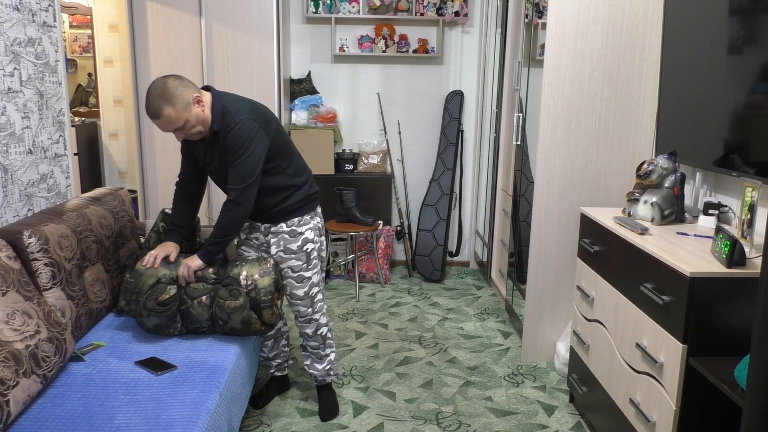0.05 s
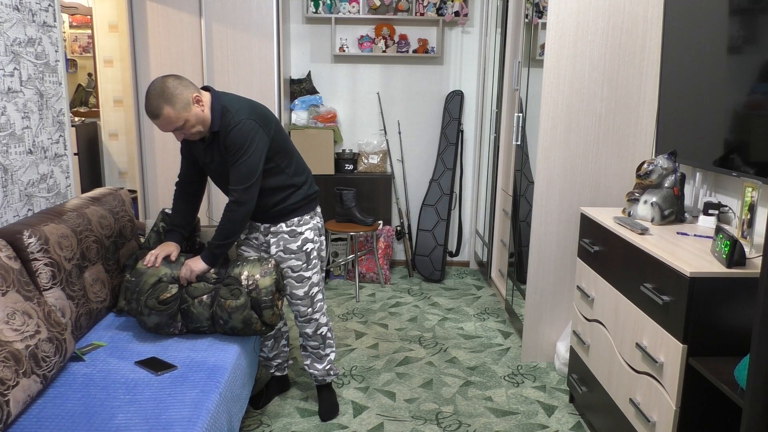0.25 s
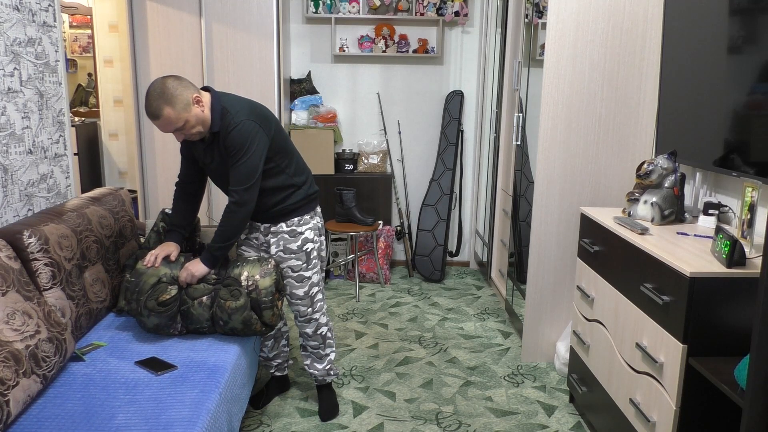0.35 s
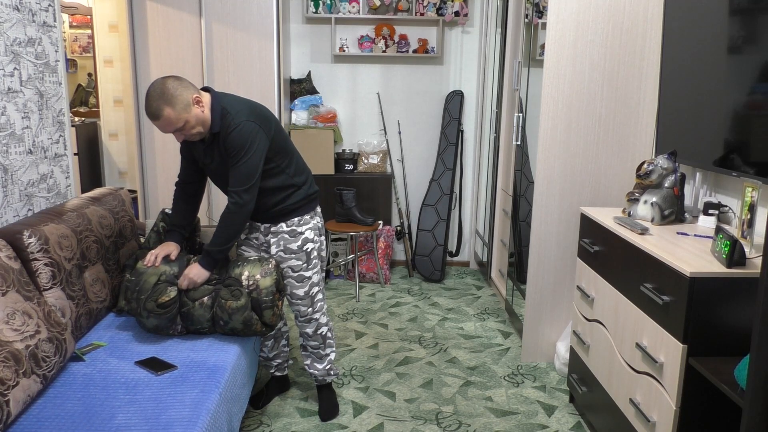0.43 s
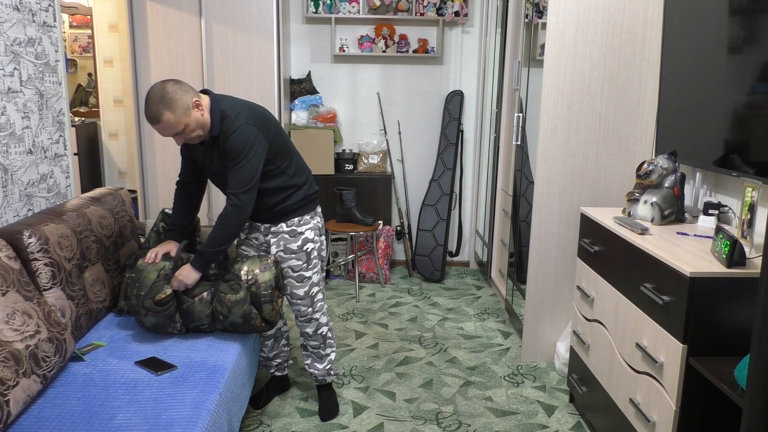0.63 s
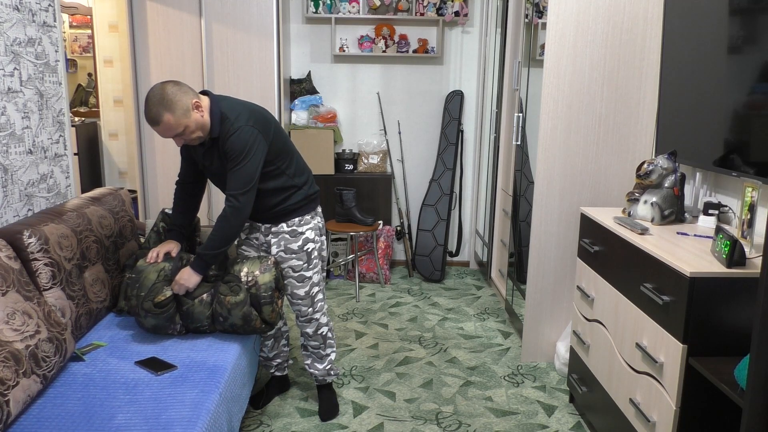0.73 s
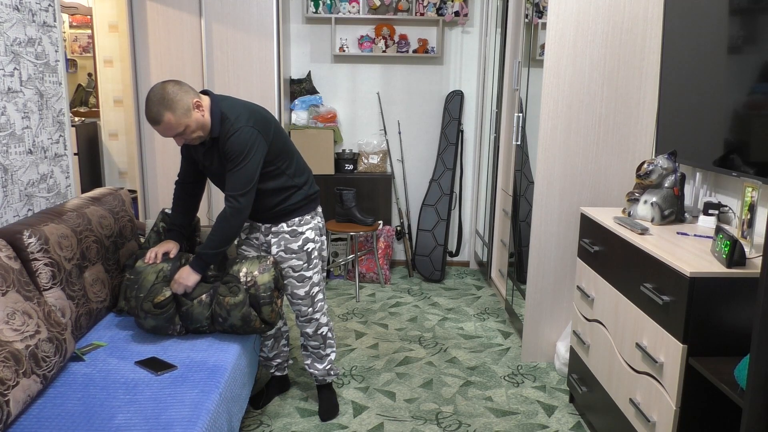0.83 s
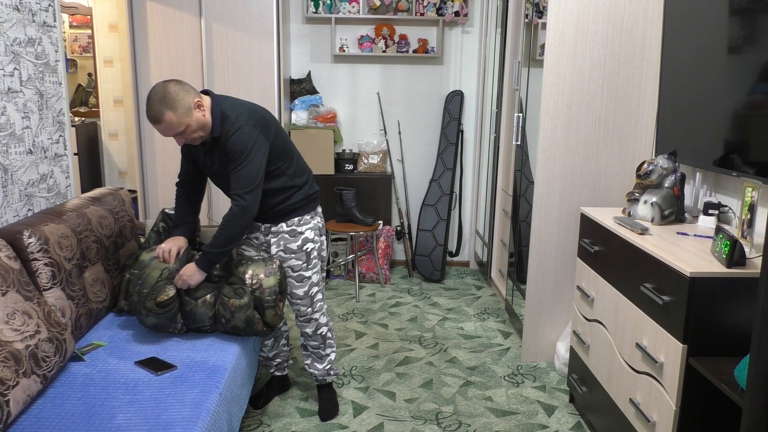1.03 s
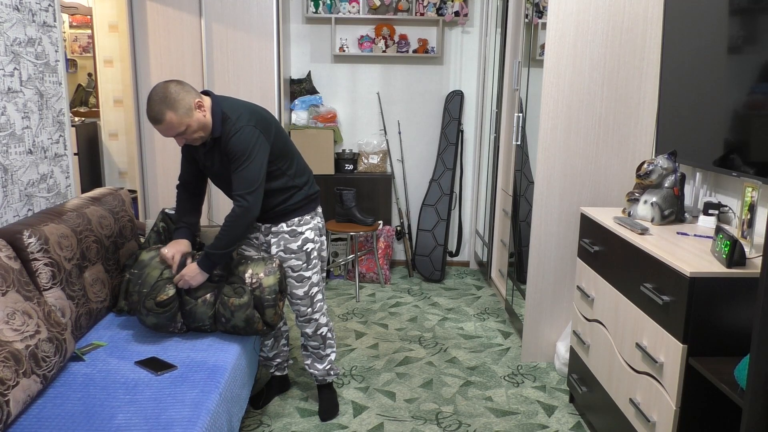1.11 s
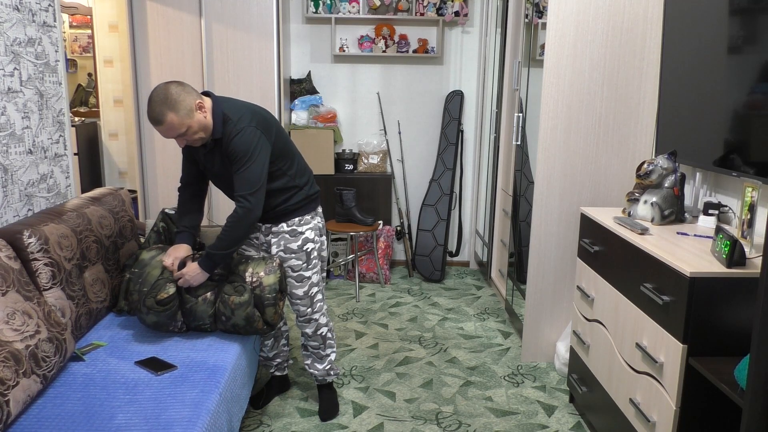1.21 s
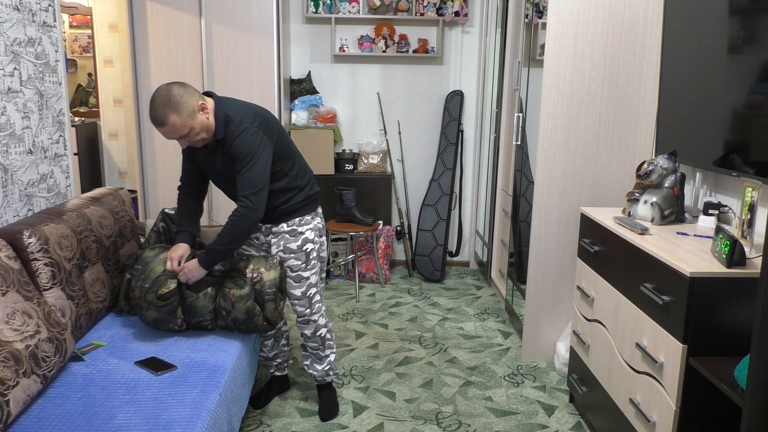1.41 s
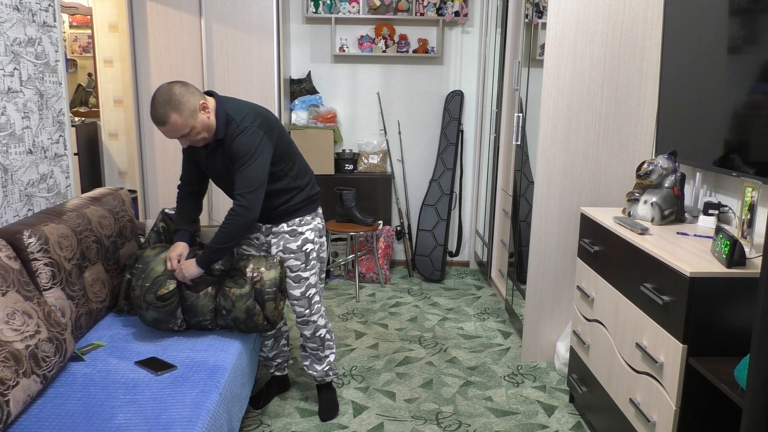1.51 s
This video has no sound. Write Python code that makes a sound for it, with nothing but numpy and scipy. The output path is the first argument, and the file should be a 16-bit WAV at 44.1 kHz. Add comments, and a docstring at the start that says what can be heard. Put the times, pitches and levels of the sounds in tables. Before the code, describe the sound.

Nylon rustles and crinkles as a stuffed sack is handled on a sofa in a quiet room. Low strap jerks run into a brief creak, followed by hissing swishes, dull rubbing of padding and a few hollow hand taps.

```python
"""A stuffed sleeping bag is worked in its nylon carry sack, on a sofa in a small room.
A taut strap gives in single jerks that run together into a short low creak, each slip ringing
the sack. Then nylon slides over nylon in long swishes, thread catching on thread, with zips of
the ribbed weave and a dull rub of padding. Folds crinkle, hands knock softly, the bulk shifts."""
import sys
import numpy as np
from scipy import signal
from scipy.fft import rfft, irfft, next_fast_len
from scipy.io import wavfile
from scipy.ndimage import map_coordinates

SR = 44100
rng = np.random.default_rng(int(sys.argv[2]) if len(sys.argv) > 2 else 0)


def file_out(sig):
    """Save sig as 16-bit WAV at sys.argv[1]."""
    # one column per channel
    cols = np.atleast_2d(sig).T
    # limit, then scale
    lim = np.clip(cols, -1, 1)
    pcm = np.round(lim * 32767).astype(np.int16)
    wavfile.write(sys.argv[1], SR, pcm)


N = 68355


def amp(db):
    """Decibels to gain."""
    return 10 ** (np.asarray(db) / 20)


def unit(x):
    """Scale to rms 1."""
    return x / np.sqrt(np.mean(x ** 2) + 1e-20)


def along(points, hz):
    """(Hz, value) points read on a log axis."""
    f, v = np.transpose(points)
    return np.interp(np.log(hz + 1), np.log(f + 1), v)


def seconds():
    """The time axis."""
    return np.arange(N) / SR


def fader(phrases):
    """Gain per sample from phrases of (s, dB) points."""
    s, db = np.vstack(phrases).T
    return amp(np.interp(seconds(), s, db))


def wobble(rate):
    """A smooth random curve, rate knots a second."""
    return map_coordinates(rng.standard_normal(2000), [seconds() * rate], mode="wrap")


def filtered(x, response):
    """Shape x with a frequency response."""
    size = next_fast_len(N + SR // 4)
    return irfft(rfft(x, size) * response(np.fft.rfftfreq(size, 1 / SR)), size)[:N]


def coloured(x, colour):
    """x through an EQ curve, at rms 1."""
    return unit(filtered(x, lambda hz: amp(along(colour, hz))))


def noise(colour):
    """Coloured noise of rms 1."""
    return coloured(rng.standard_normal(N), colour)


def band(hz, q, stages=1):
    """Noise through resonant band-passes in series, at rms 1."""
    def response(f):
        return (1j * f * hz / (q * (hz * hz - f * f) + 1j * f * hz)) ** stages
    return unit(filtered(rng.standard_normal(N), response))


def decay(s, t60):
    """An envelope that starts at s and dies away."""
    t = seconds() - s
    return (t >= 0) * np.exp(-np.log(1000) * np.abs(t) / t60)


def swell(s, width, db):
    """A bell-shaped envelope that peaks at s."""
    return amp(db) * np.exp(-.5 * ((seconds() - s) / width) ** 2)


def ring(s, hz, t60, attack_s):
    """A damped sine from s on."""
    t = np.maximum(seconds() - s, 0)
    return np.sin(2 * np.pi * hz * t) * decay(s, t60) * (1 - np.exp(-t / attack_s))


def friction(colour, catches_per_s, spread_db=2, hiss_share=0.6):
    """Tiny catches of thread on thread over a smooth hiss."""
    catches = (rng.random(N) < catches_per_s / SR) * rng.choice([-1, 1], N)
    grit = unit(catches * amp(spread_db * np.clip(rng.standard_normal(N), -2, 2)))
    hiss = rng.standard_normal(N)
    return coloured(np.sqrt(1 - hiss_share) * grit + np.sqrt(hiss_share) * hiss, colour)


# How hard the nylon slides, in two phrases. Each row: time in seconds, relative level in dB.
SWISH_FADER = [
    [(0.0, -39.5), (0.022, -54), (0.088, -57), (0.092, -62), (0.116, -67), (0.158, -32.5), (0.186, -51),
     (0.246, -28), (0.256, -34), (0.332, -36.5), (0.362, -26), (0.456, -38), (0.474, -45), (0.612, -43.5),
     (0.616, -39), (0.654, -29.5), (0.766, -33), (0.79, -44.5)],
    [(0.8, -54), (0.816, -34), (0.828, -27), (0.852, -24), (0.912, -27.5), (1.008, -24), (1.13, -30.5),
     (1.164, -29), (1.172, -29.5), (1.254, -30), (1.276, -35.5), (1.348, -35), (1.356, -31), (1.372, -42),
     (1.464, -35), (1.494, -44.5), (1.53, -39), (1.55, -45.5)],
]
# The bright tone of nylon. Each row: frequency in Hz, relative level in dB.
NYLON_EQ = [(300, -27), (1200, 0), (2000, -5.5), (2650, 3), (3400, 0.5), (4150, -2.5), (4750, 0), (5900, 0),
            (7300, -4.5), (9000, -7.5), (11500, -10.5), (14000, -11), (16000, -8.5)]
def swishes():
    """Nylon slides over nylon in a fine-grained hiss."""
    return friction(NYLON_EQ, catches_per_s=2600) * fader(SWISH_FADER) * amp(-1)


# How hard the padding rubs, in two phrases. Each row: time in seconds, relative level in dB.
RUB_FADER = [
    [(0.0, -38), (0.056, -50.5), (0.08, -36.5), (0.12, -49.5), (0.158, -45), (0.194, -50.5), (0.228, -36.5),
     (0.444, -26), (0.506, -61), (0.588, -41), (0.598, -41.5), (0.762, -40), (0.79, -47)],
    [(0.8, -57), (0.83, -32), (1.018, -30.5), (1.102, -31.5), (1.142, -24), (1.148, -21.5), (1.29, -38),
     (1.354, -35), (1.394, -44), (1.46, -37.5), (1.488, -45.5), (1.534, -43), (1.55, -45)],
]
# The muffled tone of padding. Each row: frequency in Hz, relative level in dB.
PADDING_EQ = [(90, -4), (220, -0.5), (400, 2), (600, 2), (770, 1), (1000, -5), (1250, -3), (1580, -5.5),
              (1900, -20), (4000, -30)]
def rub():
    """Cloth rubs on the padding, duller and coarser than the swish."""
    return friction(PADDING_EQ, catches_per_s=700) * fader(RUB_FADER) * amp(2)


# The strap's runs, one list each. Each row: time in seconds, slips per second, relative level in dB.
CREAK_RUNS = [
    [(.012, 112, -32), (.03, 130, -28.5), (.05, 99, -29), (.066, 64, -37)],
    [(.3535, 78, -5.5), (.374, 112, -6.5), (.4, 156, -12.5), (.42, 160, -9), (.446, 160, -15),
     (.462, 185, -29), (.49, 100, -38)],
]
# The stuffed sack's resonances. Each row: pitch in Hz, relative level in dB, t60 in seconds.
SACK_MODES = [(121.8, -1, 0.063), (220, 1.5, 0.032), (346, 0, 0.03), (460, -1, 0.02), (678, -15.5, 0.012),
              (1190, -19, 0.022)]
def creaks(jitter_s=0.00041, spread_db=2.7, low_cut_hz=48):
    """The strap sticks and slips in quick succession; every slip rings the sack."""
    slips = np.zeros(N)
    for run in CREAK_RUNS:
        s, rate, db = np.transpose(run)
        t = np.arange(s[0], s[-1], 1 / SR)
        slip_count = np.floor(np.cumsum(np.interp(t, s, rate)) / SR)
        slip_s = t[np.diff(slip_count, prepend=-1) > 0]
        lag, accent = rng.standard_normal((64, 2))[:len(slip_s)].T
        onsets = np.clip((slip_s + jitter_s * lag) * SR, 0, N - 1).astype(int)
        slips[onsets] += amp(np.interp(slip_s, s, db) + spread_db * accent)
    body = sum((-1) ** k * amp(db) * ring(0, hz, t60, attack_s=0.00051)
               for k, (hz, db, t60) in enumerate(SACK_MODES))
    low_cut = signal.butter(2, low_cut_hz, "highpass", fs=SR)
    return amp(-2.5) * signal.lfilter(*low_cut, signal.fftconvolve(slips, body)[:N])


# Folds snapping over. Each row: start in seconds, level in dB, pitch in Hz, t60 in seconds.
FOLD_SNAPS = [(0.0799, -29, 1400, 0.015), (.094, -34, 1500, 0.018), (.135, -37.5, 4470, 0.025),
              (.153, -37, 4430, 0.031), (0.2345, -29, 3970, .025), (0.2403, -29, 4100, 0.023),
              (0.3096, -24, 1300, 0.022), (0.333, -30.5, 3440, 0.035), (0.6176, -22.5, 2500, 0.015),
              (0.6357, -30, 5000, .025), (0.83, -27, 5000, 0.033), (1.1589, -16.5, 2550, 0.01),
              (1.3544, -23.5, 1800, 0.021), (1.3553, -24, 3920, 0.02), (1.4351, -31, 3000, .03),
              (1.52, -28, 3170, 0.021), (1.5294, -29, 10000, 0.012)]
def crinkles():
    """Each fold lets go in a crisp burst of noise around its own pitch."""
    return sum(amp(db) * decay(s, t60) * band(hz, q=1.53) for s, db, hz, t60 in FOLD_SNAPS)


# Shifts of the bag. Each row: peak time in seconds, width in seconds, level in dB.
BAG_SHIFTS = [(.105, 0.01, -36), (.255, 0.024, -27), (.46, 0.018, -28.5), (.635, .03, -31),
              (.76, 0.017, -38), (.9, 0.012, -32.5), (1.16, 0.036, -30.5), (1.448, 0.016, -33)]
# The bag's low-end weight. Each row: frequency in Hz, relative level in dB.
BULK_EQ = [(20, -2), (40, 0), (80, -1), (140, -7), (300, -24), (800, -50)]
def heaves():
    """The soft bulk shifts on the sofa in swells of rumble."""
    return noise(BULK_EQ) * sum(swell(*shift) for shift in BAG_SHIFTS)


# Single jerks of the strap. Each row: start in seconds, relative level in dB, pitch in Hz.
STRAP_JERKS = [(0.235, -8.5, 119), (.2445, -11.5, 133), (.2725, -10, 94), (0.2885, -25, 110),
               (0.3072, -9, 132), (0.333, -7, 150), (0.355, -4, 55.6), (0.6003, -15.5, 81),
               (0.6244, -15, 73), (.645, -12.5, 85)]
def jerks():
    """The strap gives a little: one low thud of the sack and a scuff."""
    thuds = sum(amp(db + 4) * ring(s, hz, t60=0.023, attack_s=0.00047) for s, db, hz in STRAP_JERKS)
    scuff_envelope = sum(amp(db - 14) * decay(s, t60=0.014) for s, db, _ in STRAP_JERKS)
    return scuff_envelope * noise(PADDING_EQ) - thuds


# Taps on the sack. Each row: start in seconds, relative level in dB, pitch in Hz.
SACK_TAPS = [(.2425, -12, 377), (.937, -14, 610), (1.0187, -17, 240), (1.0205, -17, 796), (1.133, -11, 406),
             (1.1465, -9, 634), (1.158, -9.5, 470), (1.329, -25, 560), (1.355, -30, 426), (1.436, -24, 520)]
def knocks():
    """Fingers and strap hit the taut sack, short and hollow."""
    return sum(amp(db + 1.5) * ring(s, hz, t60=0.023, attack_s=0.00075) for s, db, hz in SACK_TAPS)


# Strokes across the weave. Each row: peak time and width in seconds, relative level in dB, pitch in Hz.
ZIP_STROKES = [(.55, .04, -48.5, 9500), (.71, .045, -37, 5200), (.86, 0.025, -29, 5430),
               (.86, 0.027, -33.5, 10400), (1.003, 0.039, -27.5, 14100), (1.025, 0.048, -32, 8600),
               (1.235, .022, -37, 5100), (1.32, 0.034, -42, 8900)]
def zips():
    """The ribbed weave zips in a narrow band of hiss, higher for a faster slide."""
    return sum(swell(s, width, db) * band(hz, q=2.9, stages=2) for s, width, db, hz in ZIP_STROKES)


# Strokes of the palm. Each row: peak time and width in seconds, relative level in dB, pitch in Hz.
PALM_STROKES = [(.865, 0.022, -34, 1260), (.89, 0.04, -36, 332), (1.0, 0.044, -28, 820)]
def drags():
    """The palm drags over the hollow sack in swells of midrange friction."""
    return sum(swell(s, width, db) * band(hz, q=1.93, stages=2) for s, width, db, hz in PALM_STROKES)


# The room's decay. Each row: frequency in Hz, t60 in seconds.
REVERB_TIMES = [(100, 0.25), (1000, 0.27), (10000, 0.14)]
def reverb(x):
    """A furnished room answers with a short tail whose highs die first."""
    hz, t, spectra = signal.stft(rng.standard_normal(SR // 2), SR, nperseg=256)
    fade = np.exp(-np.log(1000) * t / along(REVERB_TIMES, hz)[:, None])
    _, tail = signal.istft(spectra * fade, SR, nperseg=256)
    return signal.fftconvolve(x, tail / np.linalg.norm(tail))[:N]


# The colour of the quiet room. Each row: frequency in Hz, relative level in dB.
ROOM_TONE_EQ = [(20, 9), (40, 1.5), (80, -12.5), (200, -15.5), (600, -17), (1500, -22.5), (2200, -24),
                (15000, -36.5)]
def room_tone():
    """A steady bed of low rumble and faint hiss."""
    return amp(-38) * noise(ROOM_TONE_EQ)


def scene():
    """The handling, its reverb and the room tone, in mono."""
    grip = amp(1.15 * wobble(rate=110))  # one unsteady grip shakes all the sliding layers
    cloth = grip * (swishes() + rub() + zips() + drags())
    handling = cloth + crinkles() + jerks() + creaks() + knocks() + heaves()
    return (handling + amp(-11.5) * reverb(handling) + room_tone())[None]


def record(dry):
    """A brick-wall high cut takes off the very top."""
    top_hz = 15800
    return np.array([filtered(x, lambda hz: hz < top_hz) for x in dry])


dry = scene()
out = record(dry)
file_out(out)
```